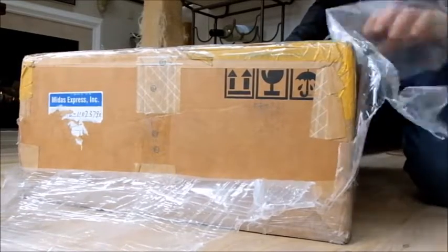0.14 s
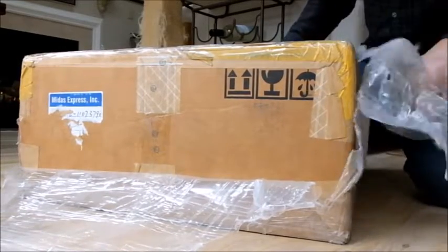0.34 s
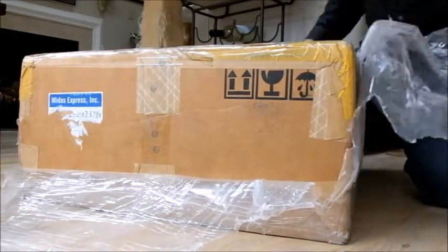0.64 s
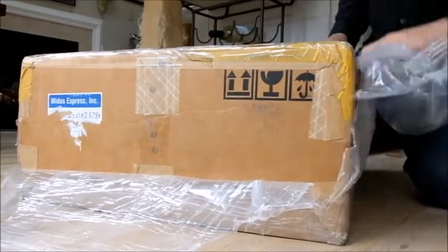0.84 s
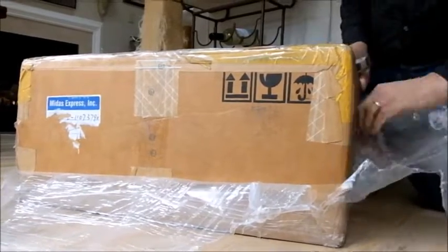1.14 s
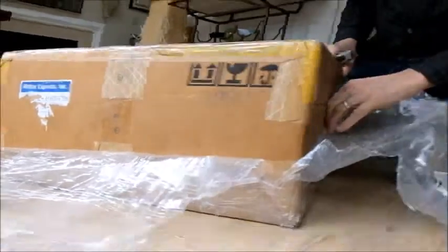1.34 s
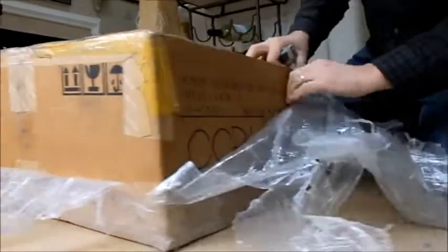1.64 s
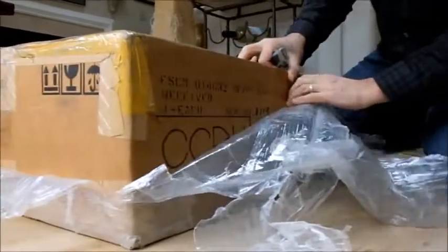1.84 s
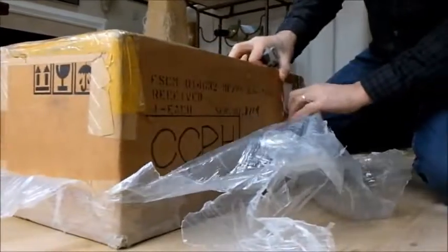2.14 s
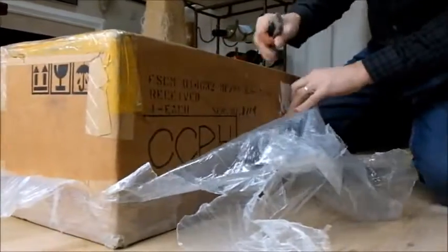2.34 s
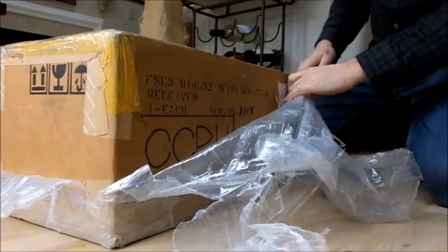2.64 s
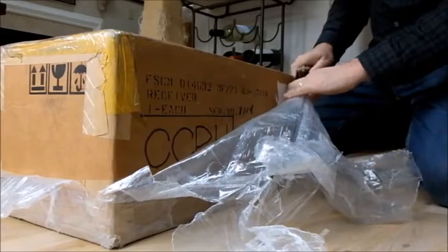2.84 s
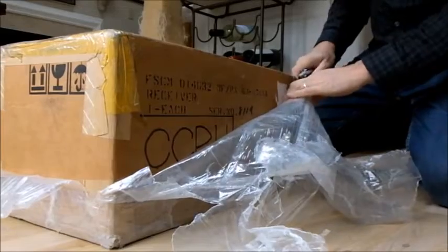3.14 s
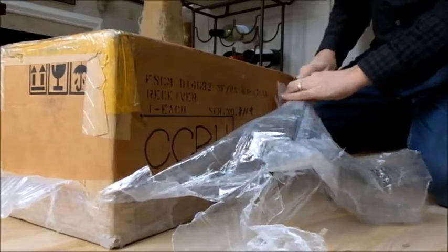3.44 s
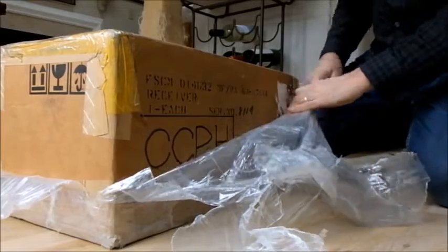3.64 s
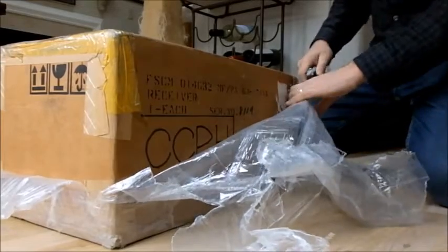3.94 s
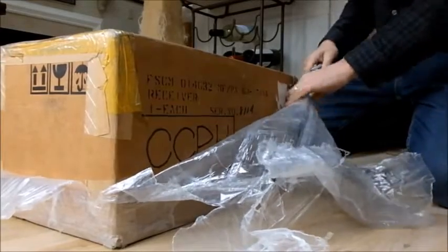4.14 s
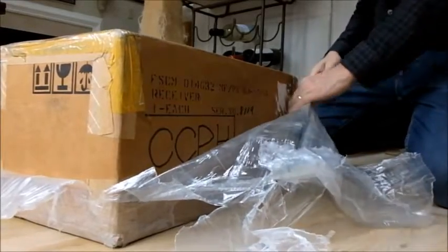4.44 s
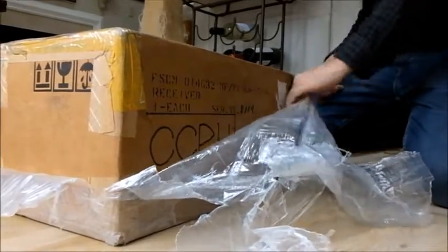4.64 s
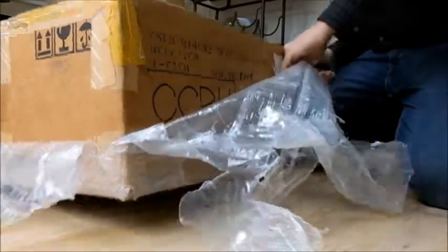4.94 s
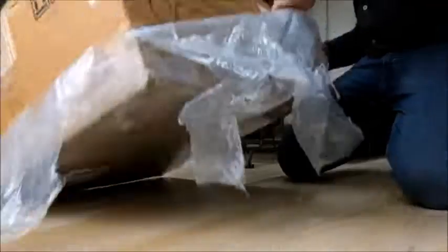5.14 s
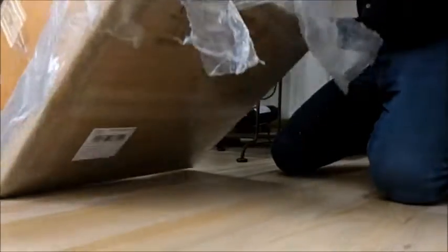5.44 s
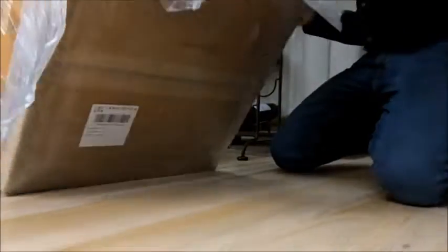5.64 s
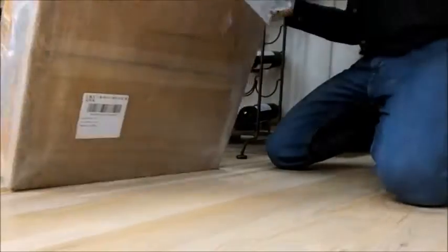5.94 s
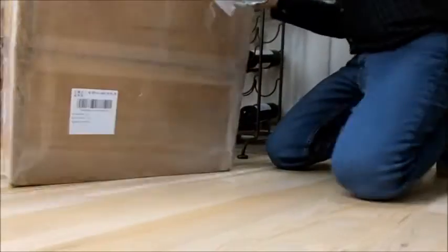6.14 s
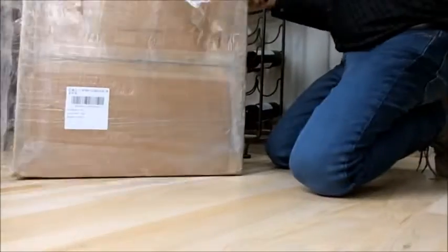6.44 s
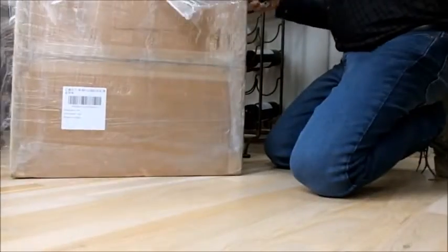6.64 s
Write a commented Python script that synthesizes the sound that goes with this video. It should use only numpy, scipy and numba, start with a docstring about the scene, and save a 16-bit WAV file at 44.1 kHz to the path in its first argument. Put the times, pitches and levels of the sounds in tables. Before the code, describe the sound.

Plastic stretch wrap crinkles and snaps sharply as it is torn from a large hollow cardboard box, with thuds as the box is tipped indoors.

```python
"""In a furnished room with a wooden floor, stretch wrap is pulled, cut and torn off a large cardboard box.
The film crinkles as thousands of tiny buckles, pops at lone creases and snaps where taut patches let go;
sliding gives fine scrapes and a stick-slip squeak. The hollow box rings in its modes when it is knocked,
tugged or dragged. A diffuse tail of echoes answers over a quiet hum, heard by two small microphones."""
import sys
import numpy as np
from scipy import signal
from scipy.fft import rfft, irfft
from scipy.io import wavfile
from scipy.ndimage import uniform_filter1d
from numba import njit

SR = 44100
rng = np.random.default_rng(int(sys.argv[2]) if len(sys.argv) > 2 else 0)


def transcribe(u):
    """Save the signal u as a 16-bit wav file named by the first command-line argument.

    u: samples, shape (n,) or (channels, n), limited to [-1, 1]; the rate is SR.
    q: integer samples, one column per channel.
    """
    v = np.clip(np.atleast_2d(u).T, -1, 1)
    q = np.round(v * 32767).astype(np.int16)
    wavfile.write(sys.argv[1], SR, q)


N = 298998
TIME = np.arange(N) / SR

# Modes of the box. Each row: frequency in Hz, level in dB, decay time t60 in seconds.
BOX_MODES = [(42.5, -4.5, 0.05), (79.7, -3.5, 0.18), (106.5, -0.5, 0.098), (143.4, 1, 0.18),
             (185.5, 0, 0.13), (246.4, 0, 0.18), (294.4, -1, 0.1), (334, 2.5, 0.12), (386.3, 2, 0.13),
             (449, -0.5, 0.055), (547, -19.5, 0.11), (707, -1, 0.12), (785, -8.5, 0.31)]


def undb(db):
    """A level in dB is twenty times the logarithm of the amplitude gain returned here."""
    return 10 ** (np.asarray(db) / 20)


def unit(x):
    """Dividing by the root mean square gives a signal unit effective amplitude."""
    return x / np.sqrt(np.mean(x ** 2))


def read(points, hz):
    """A spectrum given as (Hz, dB) points is interpolated along a logarithmic frequency axis."""
    log_hz, level_db = np.log(np.array(points)[:, 0]), np.array(points)[:, 1]
    return np.interp(np.log(np.maximum(hz, 1)), log_hz, level_db)


def walk(rate):
    """Slow random modulation: normal levels held 1 / rate s, smoothed to slews, with spread near 1."""
    hold = max(int(SR / rate), 2)
    steps = np.repeat(rng.standard_normal(N // hold + 1), hold)[:N]
    return 1.2 * uniform_filter1d(steps, hold)


@njit
def rings(n, start, lag, hz, t60, left, right, rise):
    """Damped oscillation: sines decay by 60 dB in t60 and swell with a time constant of rise * t60.
    The left port hears each grain lag samples later than the right."""
    margin = 16  # samples, room for negative lags
    out = np.zeros((2, n + 64))
    for k in range(len(start)):
        turn = np.exp(2j * np.pi * hz[k] / SR - np.log(1000.) / (t60[k] * SR))
        swell_decay = np.exp(-1. / (rise * t60[k] * SR))
        phasor, unswelled = 1. + 0j, 1.
        for i in range(start[k], min(start[k] + int(t60[k] * SR) + 2, n)):
            sample = phasor.imag * (1 - unswelled)
            out[0, i + margin + lag[k]] += left[k] * sample
            out[1, i + margin] += right[k] * sample
            phasor *= turn
            unswelled *= swell_decay
    return out[:, margin:n + margin]


def grains(s, hz, t60, size, pan_db, lag, rise=0.00089):
    """Stereo localisation: grains at s seconds differ between ports in level (pan_db) and arrival (lag)."""
    start = (np.asarray(s) * SR).astype(np.int64)
    lag = np.clip(np.round(lag), -12, 12).astype(np.int64)
    left, right = size * undb(pan_db / 2), size * undb(-pan_db / 2)
    return rings(N, start, lag, np.clip(hz, 20, .44 * SR), np.clip(t60, 1e-4, 1.), left, right, max(rise, 1e-4))


def pair(n, alike_hz):
    """Spatial coherence: the spectra of two white noises are alike in the bass, unrelated in the treble."""
    mid, side = rfft(rng.standard_normal((2, n)))
    side = side * np.clip(np.fft.rfftfreq(n, 1 / SR) / alike_hz, .25, 1)
    return np.array([mid + side, mid - side])


def effort(moves, s, fall_db_s, rest_db):
    """Addition of powers: overlapping moves sum, and the louder weighs more in the colour.
    Each swells by 20 dB per swell time up to its start, holds, then falls at fall_db_s."""
    start, swell, hold, db, colour_db = np.transpose(moves)[:, :, None]
    grid = TIME[::64]
    below_db = 20 * np.maximum(start - grid, 0) / np.maximum(swell, .002)
    fallen_db = fall_db_s * np.maximum(grid - start - hold, 0)
    power = undb(db - below_db - fallen_db) ** 2
    total = power.sum(axis=0) + undb(rest_db) ** 2
    level_db = 10 * np.log10(total)
    mean_colour_db = (power * colour_db).sum(axis=0) / total
    return np.interp(s, grid, level_db), np.interp(s, grid, mean_colour_db)


def film(s):
    """Handling excites the film: level and brightness in dB at the moments s, from separate tugs."""
    # Tugs and scrunches. Each row: start of the full level in seconds, swell in seconds, hold in seconds,
    # crinkle level in dB, brightness in dB.
    tugs = [(0, 0.086, 0.049, -42.5, 4), (.18, 0.21, 0.11, -39, 4), (.42, 0.08, 0.14, -43.5, 5),
            (.925, 0.0039, 0.049, -44.5, 3), (1.01, 0.047, 0.084, -39, 2.5), (1.15, 0.04, 0.14, -50.5, 0.5),
            (1.47, 0.21, 0.11, -44.5, 4), (1.62, 0.056, 0.14, -46, 7), (1.79, 0.092, 0.02, -43.5, 0),
            (1.96, 0.012, 0.069, -48, 4.5), (2.09, 0.017, 0.11, -47.5, 6), (2.24, .1, 0.0088, -42.5, 3),
            (2.4, 0.059, 0.13, -49.5, 4.5), (2.58, 0.06, 0.044, -52.5, -5), (2.69, 0.12, 0.029, -51, 4),
            (2.86, 0.19, 0.17, -56, 3), (3.05, 0.11, 0.09, -53, -4), (3.33, 0.0049, 0.14, -49.5, 4.5),
            (3.59, 0.047, 0.019, -37.5, -1.5), (3.7, 0.095, 0.021, -51.5, 18.5), (3.8, 0.03, 0.046, -50, 2),
            (4.01, 0.065, 0.027, -50.5, 3.5), (4.1, 0.074, 0.11, -56.5, 6.5), (4.27, 0.076, 0.0075, -53, 9),
            (4.34, 0.045, 0.017, -43.5, 0), (4.44, .08, 0.16, -61, 12), (4.73, 0.17, 0.22, -55, 3),
            (5.1, 0.13, 0.33, -52, 6), (5.6, 0.26, 0.054, -46.5, 3), (5.83, 0.15, 0.019, -51, 5),
            (6.03, 0.11, 0.053, -57.5, 6.5), (6.145, 0.009, 0.015, -42.5, 7), (6.25, 0.11, 0.21, -48, 3.5),
            (6.74, 0.15, .04, -59, 3.5)]
    return effort(tugs, s, fall_db_s=109, rest_db=-67)


def crackle(s):
    """Intermittency: the film pops fully when handled, and less while the box slides or tips."""
    # Slides, with an evener rustle. Each row: start in seconds, end in seconds.
    slides = [(1.35, 1.9), (5.1, 5.85)]
    sliding = sum((s > start) & (s < end) for start, end in slides)
    return np.where(sliding, 0.63, 1)  # share of bursts and pops left


def hum():
    """Stationary noise of the house and of the microphone: white noise shaped by a fixed spectrum."""
    # Spectrum of the noise. Each row: frequency in Hz, relative density in dB per Hz.
    spectrum = [(15, -16), (25, 0.5), (59, 0.5), (101, -2.5), (142, -4), (250, -19.5), (769, -18),
                (1910, -20.5), (6720, -37.5), (15000, -43)]
    noise = irfft(pair(N, 2500.0) * undb(read(spectrum, np.fft.rfftfreq(N, 1 / SR))), N)
    return unit(noise) * undb(-59)


def room(dry):
    """Diffuse reverberation: dense echoes decay exponentially, each band with its own decay time."""
    # Bands of the tail. Each row: centre in Hz, decay time t60 in seconds, level in dB.
    bands = [(133, 0.61, -8.5), (535, 0.1, -9), (1420, 0.6, -7), (4250, 0.11, -11), (9800, 0.088, -4)]
    n = SR // 2
    t, hz, echoes = np.arange(n) / SR, np.fft.rfftfreq(n, 1 / SR), pair(n, 2700.0)
    tail = 0
    for band_hz, t60, db in bands:
        octaves = np.log2(np.maximum(hz, 20) / band_hz)
        onset = np.clip(t / 0.0013, 0, 1)
        band = irfft(echoes * np.exp(-octaves ** 2), n) * undb(-60 * t / t60) * onset
        # the band's energy follows the share of the spectrum that it covers
        share = np.exp(-2 * octaves ** 2).mean()
        tail = tail + undb(db) * band * np.sqrt(share / np.mean(np.sum(band ** 2, axis=1)))
    return signal.fftconvolve(dry.mean(axis=0)[None], tail, axes=1)[:, :N]


def shake(count=9000, scatter_db=3.0, damping=0.74):
    """Random excitation of modes: uneven slips of the film and of the box on the boards poke the walls."""
    # Shoves and drags. Each row: start of the full level in seconds, swell in seconds, hold in seconds,
    # level in dB, upper walls against lower in dB.
    drags = [(0, 0.2, 0.089, -52.5, 8.5), (.2, 0.19, 0.11, -43.5, 6.5), (.57, .12, 0.021, -55, 4),
             (.93, 0.027, 0.046, -58, 4), (1.14, 0.23, 0.032, -48.5, 9.5), (1.4, 0.072, 0.25, -49.5, -1.5),
             (1.69, 0.13, 0.041, -42, -9), (1.9, .15, 0.18, -57, 5), (2.3, .15, 0.18, -54, -14),
             (2.56, 0.16, 0.057, -53.5, 5.5), (3.02, 0.18, 0.1, -55, 1.5), (3.35, 0.064, 0.057, -40, -6.5),
             (3.62, 0.14, 0.091, -46.5, -1), (4.05, 0.089, .05, -48, -19.5), (4.36, 0.18, 0.14, -58.5, -10),
             (5.15, 0.14, 0.22, -45, -8.5), (5.3, 0.47, 0.15, -46.5, -4.5), (5.62, 0.18, 0.076, -42.5, -17),
             (6.24, 0.15, 0.033, -44.5, -24), (6.4, .05, 0.16, -53, 0.5)]
    u = rng.random((count, 5)).T
    s = u[0] * N / SR
    hz, mode_db, t60 = np.array(BOX_MODES)[(u[1] * len(BOX_MODES)).astype(int)].T
    hz = hz * (1 + 0.1 * (u[4] - .5))
    level_db, upper_db = effort(drags, s, fall_db_s=89, rest_db=-72)
    size = undb(mode_db - scatter_db * np.log(u[2] + 0.0091) - 4.7 * (hz < 90))
    tilt_db = np.clip(np.log2(hz / 180) / 0.61, 0, 1) * upper_db
    place = (6.2 * (u[3] - .55), 16 * (u[3] - .4), .03)  # pan in dB, lag in samples, rise
    # slips of even effort set the reference level
    even = grains(s, hz, damping * t60, size, *place)
    walls = grains(s, hz, damping * t60, size * undb(level_db + tilt_db), *place)
    return walls / np.sqrt(np.mean(even ** 2))


def knocks(width=0.42):
    """Modal excitation: a blow rings the modes within some width octaves of the struck wall's pitch."""
    # Blows on the box. Each row: start in seconds, level in dB, pitch of the struck wall in Hz,
    # contact time in seconds.
    blows = [(0.541, -29.5, 314, 0.0027), (0.92, -33, 383, 0.0018), (1.096, -17, 410, 0.001),
             (1.22, -12.5, 154, 0.0015), (1.382, -29, 139, 0.0028), (2.261, -25.5, 506, 0.0025),
             (2.517, -23.5, 334, 0.0041), (3.402, -25.5, 105, 0.0028), (3.587, -19.5, 85, 0.0036),
             (4.313, -35.5, 158, 0.0015), (5.779, -20.5, 48, 0.0032), (6.143, -29, 500, 0.0015),
             (6.405, -31, 221, 0.0028), (6.423, -16.5, 81.6, 0.0013), (6.452, -22, 80, 0.0019),
             (6.504, -34.5, 144, 0.0023)]
    out = np.zeros((2, N))
    hz, mode_db, t60 = np.transpose(BOX_MODES)
    for s, db, wall_hz, contact in blows:
        size = undb(db + mode_db - 7) / (1 + (np.log2(hz / wall_hz) / width) ** 2)
        # every blow bends the walls differently: pitches shift and rings shorten
        u = rng.random((2, len(hz)))
        bent_hz, short_t60 = hz * (1 + 0.036 * (u[0] - .5)), t60 * (1 - 0.28 * u[1])
        ring = grains(0 * hz, bent_hz, short_t60, size, 0 * hz, 0 * hz)[0, :SR // 2]
        # a softer contact spreads the push
        push = np.hanning(int(np.clip(contact, .0003, .02) * SR) + 2)
        ring = np.convolve(ring, push / push.sum())
        # a wall radiates little below its own pitch
        ring = signal.sosfilt(signal.butter(2, 0.64 * wall_hz, "high", fs=SR, output="sos"), ring)
        i = int(s * SR)
        out[:, i:i + len(ring)] += ring[:N - i]
    return out


def swish(count=1500):
    """Sliding friction: film and cardboard on the boards give fine scrapes crowded around one pitch."""
    # Slides. Each row: middle in seconds, half length (standard deviation) in seconds, pitch in Hz,
    # level in dB, glide in octaves per half length.
    strokes = [(0.22, 0.065, 1910, -42, 0.014), (1.705, 0.058, 5200, -52.5, 0.13),
               (1.795, 0.039, 672, -45.5, -0.042), (1.98, .014, 713, -42.5, 0.039),
               (2.027, .03, 2700, -52.5, 0.086), (2.158, 0.031, 2790, -58, 0.04),
               (3.66, .045, 1200, -44, -0.023), (5.549, .2, 260, -53.5, 0.052),
               (6.042, 0.048, 1480, -55.5, -0.042), (6.19, .04, 2100, -49.5, -0.052)]
    out = 0
    for middle, half, hz, db, glide in strokes:
        g = rng.standard_normal((count, 4)).T
        pitch = hz * 2 ** (0.17 * g[1] + glide * g[0])
        t60 = 11. / hz + 0 * g[0]
        scrape = grains(middle + half * g[0], pitch, t60, g[2], 0 * g[0], 2.1 * g[3], rise=0.089)
        out = out + undb(db) * scrape / np.sqrt(np.sum(scrape ** 2) / (4 * half * SR))
    return out


def squeak():
    """Stick-slip oscillation: taut film on cardboard gives a tone that sags, throbs and wavers in pitch."""
    # Tones. Each row: start in seconds, end in seconds, pitch in Hz, level in dB, throb in dB.
    tones = [(6.252, 6.35, 668, -50, 1.5)]
    out = 0
    for start, end, hz, db, throb_db in tones:
        waver = 0.01 * throb_db * walk(150)  # grows with the throb
        sag = 0.21 * np.clip(TIME - start, 0, .2)
        phase = 2 * np.pi * hz * np.cumsum(1 + waver - sag) / SR
        edge = np.clip(np.minimum(TIME - start, end - TIME) / 0.012, 0, 1)
        out = out + np.sqrt(2) * edge * undb(db + throb_db * walk(90)) * np.sin(phase)
    return out


def ticks(low_hz=1480.0, octaves=1.5, cycles=6.7, scatter_db=10.5, overtone_db=-5.5):
    """Inharmonic partials: lone creases pop at random, as strong as the film is handled."""
    u = rng.random((int(38 * N / SR), 5)).T  # 38 pops per second
    s, hz = u[0] * N / SR, low_hz * 2 ** (octaves * u[1])
    over_film_db = 3 + scatter_db * np.log(u[2] + .05)
    size = crackle(s) * undb(film(s)[0] + over_film_db)
    place = (6.0 * (u[3] - .6), 14.0 * (u[4] - .5), .03)  # pan in dB, lag in samples, rise
    out = 0
    for k, ratio in enumerate((1, 1.55, 2.4, 3.6)):
        out = out + grains(s, ratio * hz, cycles / hz, size * undb(k * overtone_db), *place)
    return out


def snaps(count=60, cycles=7.5, tick_db=7.5, rattle_s=0.056):
    """Release of elastic tension: a taut patch rings briefly with a sharp tick, then smaller buckles die away."""
    # Releases. Each row: start in seconds, level in dB, ring pitch in Hz, treble in dB, rattle in dB.
    releases = [(0.4387, -23.5, 1360, -17, -4), (0.471, -29, 2500, -3.5, -12),
                (0.57, -35.5, 3200, -3.5, -11), (0.607, -28.5, 2110, -24, -7),
                (0.9224, -49, 1560, -20, -10), (0.941, -38.5, 970, -4.5, 11.5),
                (1.059, -25, 1240, -32, -12), (1.096, -14, 1170, -38, -17), (1.1279, -27.5, 1320, -22, -22),
                (1.5139, -29.5, 1410, -20, -2), (1.8145, -22.5, 2170, -31, -20),
                (2.0987, -31.5, 1180, -38, -2), (2.1635, -24, 2240, -18, -1.5),
                (2.2667, -23, 1380, -32, -6), (2.357, -24.5, 1830, -9.5, 0), (2.369, -32.5, 3500, -4, -2),
                (2.385, -36, 4420, -11, -14), (2.505, -23.5, 1180, -31, 0.5), (2.5203, -25, 1930, -35, -13),
                (2.587, -35, 1350, -6.5, -9), (2.6835, -31, 1110, -15.5, -11),
                (2.8415, -30.5, 1410, -10.5, -1), (2.869, -40, 3000, -13, -12),
                (2.895, -35.5, 1140, -8, -1), (2.9067, -43, 3000, -4, -10), (2.935, -26, 1350, -8.5, -1),
                (3.0459, -36, 2000, -11, -1), (3.1125, -30.5, 2050, -12.5, 2), (3.3283, -32, 1510, -5.5, 3),
                (3.337, -31, 1540, -28, -3), (3.3544, -18, 1290, -20, -10), (3.367, -12.5, 1230, -24, -9),
                (3.3968, -7, 1120, -22.5, -18), (3.4058, -24, 1290, -7, 4), (3.5821, -18.5, 1360, -20, 0),
                (3.5898, -14.5, 1980, -16.5, 7), (3.5939, -19, 2920, -24, 2.5),
                (3.7042, -29, 1060, -6, -15), (3.7129, -27.5, 1300, -30, 7), (3.897, -40, 4000, -4.5, -13),
                (3.92, -47, 2960, -17, -14), (3.9397, -34.5, 2500, -13, -12), (3.982, -31, 1110, -7.5, -14),
                (4.074, -35.5, 1970, -4, 3), (4.3465, -22, 2060, -15, -7), (4.36, -26, 2350, -21, -16),
                (4.374, -26.5, 2530, -13, -13), (4.3899, -24, 2570, -14, -19),
                (4.4883, -23, 3370, -20, -14), (4.5727, -24, 2350, -46, -8.5),
                (4.689, -24.5, 3760, -33, -1.5), (4.7714, -39.5, 2580, -13, -16),
                (4.785, -35, 1430, -21, -10), (4.799, -26, 2130, -25, 3.5), (4.934, -34, 1180, -11.5, -12),
                (5.0634, -37, 3300, -14, -2), (5.089, -23, 3670, -22, -9), (5.345, -41, 3500, -8, -12),
                (5.4065, -28, 1800, -9.5, -16), (5.8914, -28.5, 1450, -15, -3),
                (6.128, -36, 1990, -7.5, -3), (6.1428, -25, 1300, -7.5, 6), (6.2462, -28, 1920, -10, -8),
                (6.376, -31, 1300, -30, -15)]
    s, db, hz, treble_db, rattle_db = np.transpose(releases)
    u = rng.random((len(s), 4, count)).transpose(1, 0, 2)
    pan_db, lag = 2.0 * (u[2, :, 0] - 1.1), 6.8 * (u[3, :, 0] - .5)
    size = undb(db)
    out = grains(s, hz, cycles / hz, 1.01 * size, pan_db, lag, rise=0.03)

    # the tick: five treble grains within 2.8 ms; a dull snap loses most at the top
    tick_bands = ((2600., 0.57), (3800., 0.84), (5600., 1.19), (8500., 1.5), (12000., 1.85))
    for k, (tick_hz, dulling) in enumerate(tick_bands):
        moment = s + 0.0028 * u[0, :, k]
        pitch = tick_hz * 2 ** (.5 * u[1, :, k] - .25)
        t60 = 5.7 / tick_hz + 0.0012 + 0 * s
        level = size * undb(dulling * treble_db + tick_db - 4.0)
        out += grains(moment, pitch, t60, level, pan_db, lag, rise=0.023)

    # the rattle: small buckles crowd after the snap and fall by 63 dB over rattle_s
    after = u[0] ** 1.5
    octaves = 3.25 * u[1] - 1.1
    pitch = (hz[:, None] * 2 ** octaves).ravel()
    tilt_db = treble_db[:, None] * np.clip(octaves / 2.8, 0, 1)
    late = size[:, None] * undb(rattle_db[:, None] - 63 * after + tilt_db) * (2 * u[2] - 1)
    late_s = (s[:, None] + rattle_s * after).ravel()
    late_pan_db = np.repeat(pan_db, count)
    late_lag = np.repeat(lag, count) + 3.7 * (u[3].ravel() - .5)
    return out + grains(late_s, pitch, 7.0 / pitch, late.ravel(), late_pan_db, late_lag, rise=0.018)


def crinkle(count=50000, cycles=4.62, scatter_db=2.5, burst_db=2.5, spread=2.5, pan_db=-0.7):
    """Buckling instability: thousands of buckles, each with its own pitch, size and place, come in bursts."""
    # Size of one buckle against its pitch. Each row: frequency in Hz, level in dB.
    buckle_sizes = [(250, -7.5), (500, -3), (1000, 0), (1500, 3.5), (2500, 0.5), (4000, -4.5), (7000, -14),
                    (12000, -4.5)]
    u, g = rng.random((count, 4)).T, rng.standard_normal((count, 2)).T
    s, hz = u[0] * N / SR, 250 * 48 ** u[1]
    level_db, bright_db = film(s)
    bursts = np.clip(burst_db * walk(70)[(s * SR).astype(int)], -4, 4) * crackle(s)
    size_db = read(buckle_sizes, hz) - scatter_db * np.log(u[2] + 0.0021) + bursts
    size = undb(size_db) * np.sign(u[3] - .5)
    place = (pan_db + 5.4 * g[0], spread * g[1], .08)  # pan in dB, lag in samples, rise
    # film of even effort sets the reference level
    even = grains(s, hz, cycles / hz, size, *place)
    # brightness tilts the buckles above the middle of the range
    tilt_db = bright_db * np.clip(np.log2(hz / 1500) / 0.8, 0, 1.3)
    sheet = grains(s, hz, cycles / hz, size * undb(level_db + tilt_db), *place)
    return sheet / np.sqrt(np.mean(even ** 2))


def scene():
    """Superposition: film and box add up, the room answers them, and the hum lies beneath."""
    box = shake() + knocks()
    wrap = swish() + squeak() + ticks() + snaps() + crinkle()
    dry = box + wrap
    return hum() + room(dry) + dry


def record(dry):
    """Band limitation: small microphones lose the deepest bass and grow duller upward; the top is cut."""
    bass_loss = signal.butter(2, 35., "high", fs=SR, output="sos")
    dulling = signal.butter(1, 5000., fs=SR, output="sos")
    top_cut = signal.ellip(8, .2, 70, 15800, fs=SR, output="sos")
    return signal.sosfilt(np.vstack([bass_loss, dulling, top_cut]), dry)


dry = scene()
out = record(dry)
transcribe(out)
```